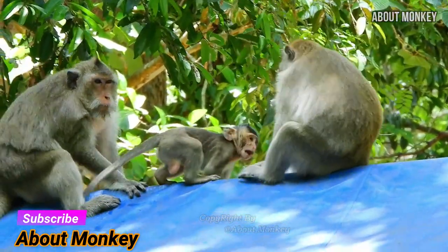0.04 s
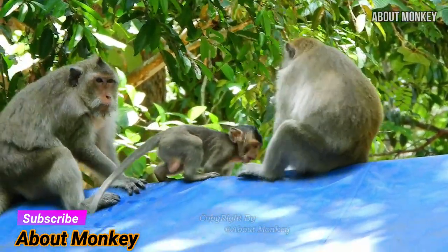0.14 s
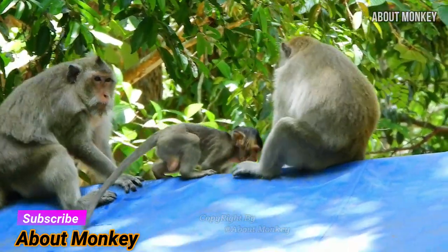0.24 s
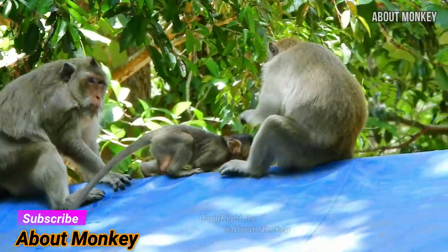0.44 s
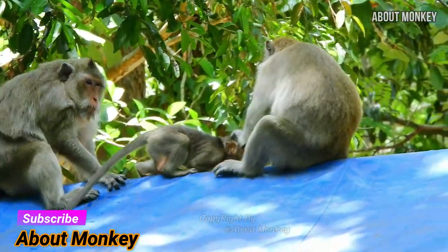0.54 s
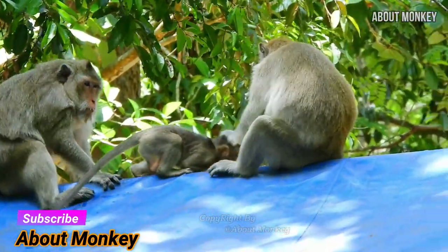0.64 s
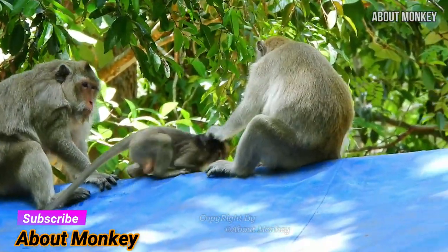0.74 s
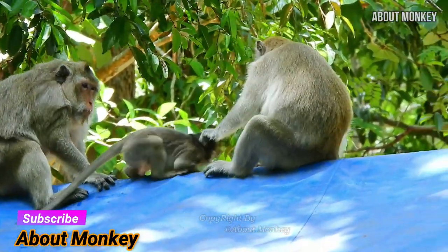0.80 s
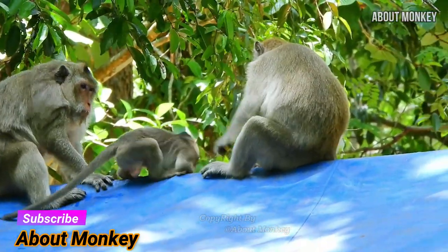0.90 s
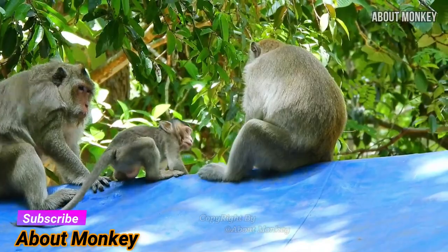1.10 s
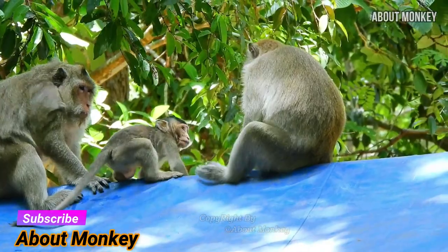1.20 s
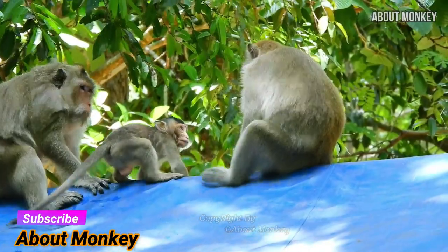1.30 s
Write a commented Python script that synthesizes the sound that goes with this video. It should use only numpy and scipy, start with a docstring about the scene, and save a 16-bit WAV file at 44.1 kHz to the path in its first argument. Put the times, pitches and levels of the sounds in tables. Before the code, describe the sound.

Very high, raspy baby monkey squeaks burst out rapidly, then fade into quiet leafy outdoor air

```python
"""A baby monkey squeals three times in one quick run on a tarpaulin under trees.
Each squeak is a pitch-curved whistle that roughens into rasp and hiss: the first mostly falls,
the second climbs and breaks into a rasp, the third arches high and drops; gliding noise bands form
hoarse undertones and small late calls. Reflections and a noise tail with lingering pitches ring on;
soft bumps are single low modes with scuffing, a twig tap is four decaying modes,
and shaped noise gives a low outdoor rumble and leaf hiss, its treble fading slowly."""
import sys
import numpy as np
from scipy import signal
from scipy.fft import rfft, irfft
from scipy.io import wavfile
from scipy.ndimage import uniform_filter1d

SR = 44100
rng = np.random.default_rng(int(sys.argv[2]) if len(sys.argv) > 2 else 0)


def master_out(mix):
    """Clip the mix to full scale and print it as 16-bit PCM to the path in sys.argv[1]."""
    frames = np.transpose(np.atleast_2d(mix))
    ceiling = np.clip(frames, -1, 1)
    pcm = np.round(ceiling * 32767).astype(np.int16)
    wavfile.write(sys.argv[1], SR, pcm)


N = 59535

# squeak curves: time_s, pitch_hz, level_db, roughness_0_to_1
FALLING_SQUEAK = [(.168, 8900, -51, 0.38), (.177, 9200, -52.5, 0.04), (.184, 9250, -39, 0.23),
                  (.189, 7905, -44.5, 0), (.198, 6100, -35.5, .2), (.207, 5720, -43, 0.54),
                  (.213, 5243, -45, 0.63), (.220, 5203, -40.5, 0.28), (.227, 5843, -39.5, 0.88),
                  (.238, 6380, -39, 0.5)]
CLIMBING_SQUEAK = [(.241, 6580, -28.5, .02), (.247, 6636, -26, 0.027), (.257, 6500, -38.5, 0.078),
                   (.263, 6340, -35.5, 0.39), (.271, 6049, -39, 0.87), (.273, 6455, -27.5, 0.19),
                   (.276, 6654, -23.5, 0.19), (.279, 7110, -30, 0.16), (.283, 7220, -24, 0.065),
                   (.292, 7400, -23, 0.081), (.301, 8030, -16.5, 0.084), (.305, 8150, -30.5, 0.31),
                   (.314, 8250, -24, 0.21), (.321, 8350, -33, 0.79), (.330, 8300, -27, 0.37),
                   (.337, 8680, -31.5, 0.49), (.356, 8900, -45, 0.97), (.368, 9310, -37.5, 0.33),
                   (.378, 9300, -40.5, 0.41), (.382, 8700, -38, 0.33), (0.39, 8720, -36, 0.17),
                   (.396, 8860, -47, .3)]
ARCHING_SQUEAK = [(.425, 9500, -45, 0.42), (.437, 10270, -43, 0.16), (.447, 10470, -43, 0.1),
                  (.456, 10130, -34, 0.064), (.465, 9540, -34, .12), (.474, 10050, -40, 0.2),
                  (.489, 10120, -33, .11), (.498, 10200, -37.5, 0.16), (.505, 10420, -50, .25),
                  (.519, 11050, -45.5, 0.21), (.528, 10680, -42.5, .25), (.540, 9580, -32.5, 0.13),
                  (.551, 8990, -41, 0.33), (.563, 8200, -46, .7), (.571, 7220, -47.5, 0.67),
                  (.576, 5500, -49.5, 0.44)]
EDGE_S, PITCH_SMOOTH_SAMPLES = 0.003, 130  # onset and release; pitch averaging
# pitch tremble, rms share of the pitch; the rasp share is at full roughness
JITTER_SHARE, JITTER_HZ = 0.0052, 262
RASP_JITTER_SHARE, RASP_JITTER_HZ = 0.0351, 727
# noise at full roughness: band on the whistle, side band below it, hiss
RASP_WIDTH_HZ, RASP_DB = 1100, 1.5
GROWL_PITCH_RATIO, GROWL_WIDTH_HZ, GROWL_DB = 0.61, 940, -17
AIR_DB = -3.5
FLUTTER_DB, FLUTTER_HZ = 2.4, 150  # rms level tremble at full roughness
# spectrum shape of the squeak hiss: freq_hz, relative_db
AIR_SHAPE = [(1500, -72), (2500, -24), (3400, -9), (4200, -13.5), (5000, -2.5), (6500, 1), (8000, 5.5),
             (9600, 0.5), (11000, -3.5), (12000, -14)]
# hoarse undertones where the voice cracks, then a small low chirp and a late call:
# start_s, length_s, start_hz, end_hz, width_hz, level_db, octave_re_base_db
HOARSE_BANDS = [(0.264, 0.0134, 2620, 2770, 230, -60.5, 17), (.308, 0.019, 2780, 2720, 150, -49, 2),
                (.304, 0.068, 3403, 3298, 520, -48, -10), (.320, 0.021, 2572, 2504, 220, -62, 15.5),
                (.581, 0.0237, 2480, 2120, 580, -52.5, -9), (.600, 0.07, 2660, 2600, 261, -58.5, -6)]
# soft bumps on the tarpaulin: start_s, pitch_hz, level_db, scuff_re_body_db, left_minus_right_db
BUMPS = [(0.065, 79.5, -58, -18, 5), (0.14, 89, -52, -16, 7), (.268, 200, -46, -15, 4),
         (0.354, 147, -49.5, -17, -3), (0.615, 150, -47.5, -14, -1), (0.659, 147.6, -49.5, -18, -3),
         (0.74, 131, -45.5, -16.5, -10), (0.939, 140, -41.5, -25, 20), (1.127, 139, -47, -26, -7),
         (1.231, 178, -42, -9, -22)]
BUMP_RISE_S, BUMP_LENGTH_S = 0.0095, 0.125
SCUFF_HZ, SCUFF_WIDTH_HZ = 314.6, 320
TAP_START_S, TAP_DB = 1.3408, -41.5
# twig modes: freq_hz, level_re_tap_db, t60_s
TWIG_MODES = [(1020, -19, .012), (1514, 2, .029), (2140, 2, 0.011), (3540, -8, 0.024)]
# early reflections: delay_s, left_gain, right_gain
REFLECTIONS = [(.0034, 0.063, -0.086), (.0078, 0.14, 0.13), (.0135, -.14, .17), (.021, .15, .14)]
# diffuse tail of the surroundings: freq_hz, t60_s, relative_db
TAIL_DECAY = [(500, .18, -2), (3000, 0.72, 0), (6400, 0.64, 0), (8000, .56, -3.5), (9060, 0.63, 4),
              (10000, 0.53, 0.5), (11000, 0.54, 1)]
# pitches lingering in the surroundings: freq_hz, level_re_tail_db, t60_s
LINGERING_MODES = [(6455, -49.5, 0.43), (6600, -59, 0.37), (7240, -64.5, .7), (7500, -59, 0.54),
                   (8180, -56, .5), (9100, -55, .65)]
VOICE_TAIL_DB, SMALL_TAIL_DB = -1.66, -5  # tail re direct sound: squeaks; hoarse bands and tap
TAIL_LIKENESS, TAIL_RISE_S = 0.14, 0.0029
# outdoor background spectrum shape: freq_hz, relative_db
OUTDOOR_SHAPE = [(20, -27), (45, -18.5), (85, -23), (120, -4.5), (155, 3), (220, -10), (300, -14),
                 (520, -15.5), (720, -18), (1200, -16), (2000, -19.5), (2800, -20), (4200, -23),
                 (7000, -20.5), (9300, -17.5), (10800, -28), (12000, -20.5), (15000, -46)]
# outdoor background stereo: freq_hz, left_right_correlation
OUTDOOR_LIKENESS = [(30, -0.33), (130, 0.12), (300, 0.65), (800, 0.71), (3000, 0.58), (10000, 0.049)]
OUTDOOR_DB, PATCH_DB = -51, 1.5  # overall rms; rms of the patches
TREBLE_FADE_DB_PER_S, TREBLE_FROM_HZ = 2.5, 2500  # the treble hiss fades slowly
TREBLE_EDGE_HZ, BAND_LIMIT_HZ, TREBLE_LEAK_DB = 11200, 15100, -13.5


def amp(db):
    """Decibels to gain."""
    return 10 ** (np.asarray(db) / 20)


def evened(x):
    """Scales to rms 1."""
    return x / np.sqrt(np.mean(x ** 2) + 1e-20)


def read(points, hz):
    """Reads a spectrum on a log-frequency axis."""
    f, value = np.transpose(points)
    return np.interp(np.log(hz + 1), np.log(f + 1), value)


def add(mix, start_s, sound):
    """Mixes a sound in at its start, cut at the end of the mix."""
    part = mix[..., round(start_s * SR):][..., :sound.shape[-1]]
    part += sound[..., :part.shape[-1]]


def filtered_noise(gain, n):
    """White noise shaped by a spectrum gain, scaled to rms 1 before trimming to n samples."""
    return evened(irfft(rfft(rng.standard_normal(N)) * gain, N))[:n]


def wobble(n, hz):
    """Smooth random motion up to about hz."""
    f = np.fft.rfftfreq(N, 1 / SR)
    return filtered_noise(1 / (1 + (f / hz) ** 2), n)


def fuzzy(hz, width_hz):
    """A noisy band that follows a pitch curve: two slow noises on carriers in quadrature."""
    phase = 2 * np.pi * np.cumsum(hz) / SR
    in_phase = wobble(len(hz), width_hz / 2) * np.cos(phase)
    quadrature = wobble(len(hz), width_hz / 2) * np.sin(phase)
    return in_phase + quadrature


def squeak(curve):
    """A trembling whistle that gives way to rasp and hiss as it roughens."""
    time_s, pitch_hz, level_db, roughness = np.transpose(curve)
    t = np.arange(time_s[0] - EDGE_S, time_s[-1] + EDGE_S, 1 / SR)
    n = len(t)
    rough = np.clip(np.interp(t, time_s, roughness), 0, 1)
    hz = uniform_filter1d(np.interp(t, time_s, pitch_hz), size=PITCH_SMOOTH_SAMPLES)

    tremble = JITTER_SHARE * wobble(n, JITTER_HZ)
    rasp_tremble = RASP_JITTER_SHARE * rough * wobble(n, RASP_JITTER_HZ)
    phase = 2 * np.pi * np.cumsum(hz * (1 + tremble + rasp_tremble)) / SR
    whistle = np.sqrt(2 * (1 - rough ** 2)) * np.sin(phase)

    rasp = amp(RASP_DB) * fuzzy(hz, RASP_WIDTH_HZ)
    growl = amp(GROWL_DB) * fuzzy(GROWL_PITCH_RATIO * hz, GROWL_WIDTH_HZ)
    air_gain = amp(read(AIR_SHAPE, np.fft.rfftfreq(N, 1 / SR)))
    air = amp(AIR_DB) * filtered_noise(air_gain, n)
    voice = whistle + rough * (rasp + growl + air)

    gate = np.clip(np.minimum(t - t[0], t[-1] - t) / EDGE_S, 0, 1)
    flutter_db = FLUTTER_DB * rough * wobble(n, FLUTTER_HZ)
    return t[0], voice * gate * amp(np.interp(t, time_s, level_db) + flutter_db)


def hoarse_band(start_s, length_s, start_hz, end_hz, width_hz, level_db, octave_db):
    """A short hoarse undertone or small call: a gliding noise band with its octave."""
    u = np.linspace(0, 1, round(length_s * SR))
    hz = start_hz + (end_hz - start_hz) * u
    base = evened(fuzzy(hz, width_hz))
    octave = amp(octave_db) * fuzzy(2 * hz, 2 * width_hz)
    envelope = np.sqrt(abs(np.sin(np.pi * u)))
    return start_s, amp(level_db) * envelope * (base + octave)


def bump(start_s, pitch_hz, level_db, scuff_db, pan_db):
    """A padded push swells and dies in one low mode, with a little scuffing."""
    t = np.arange(int(BUMP_LENGTH_S * SR)) / SR
    swell = t / BUMP_RISE_S * np.exp(1 - t / BUMP_RISE_S)
    mode = np.sin(2 * np.pi * pitch_hz * t)
    scuff = amp(scuff_db) * fuzzy(np.full(len(t), SCUFF_HZ), SCUFF_WIDTH_HZ)
    sides = evened(amp([[pan_db / 2], [-pan_db / 2]]))
    return start_s, amp(level_db) * sides * swell * (mode + scuff)


def tap():
    """A dry tick of a twig: a few modes decaying exponentially."""
    t = np.arange(SR // 20) / SR
    tick = np.zeros(len(t))
    for hz, db, t60_s in TWIG_MODES:
        tick += amp(TAP_DB + db - 60 * t / t60_s) * np.sin(2 * np.pi * hz * t)
    return TAP_START_S, tick


def surroundings(x, tail_db):
    """Direct sound, a few near reflections and a diffuse tail in which some pitches linger."""
    a, b = rng.standard_normal((2, SR))
    noise = np.array([a, TAIL_LIKENESS * a + np.sqrt(1 - TAIL_LIKENESS ** 2) * b])
    hz, t, z = signal.stft(noise, SR, nperseg=256)
    decay = np.array(TAIL_DECAY)
    t60_s = read(decay[:, :2], hz)[:, None]
    fade_db = read(decay[:, [0, 2]], hz)[:, None] - 60 * t / t60_s
    rise = 1 - np.exp(-t / TAIL_RISE_S)
    tail = signal.istft(z * amp(fade_db) * rise, SR, nperseg=256)[1]

    t = np.arange(tail.shape[1]) / SR
    modes = np.zeros(len(t))
    for mode_hz, db, mode_t60_s in LINGERING_MODES:
        modes += amp(db - 60 * t / mode_t60_s) * np.sin(2 * np.pi * (mode_hz * t + rng.random()))

    response = amp(tail_db) * (tail / np.linalg.norm(tail[0]) + modes)
    response[:, 0] += 1  # direct sound
    for delay_s, left, right in REFLECTIONS:
        response[:, round(delay_s * SR)] += left, right
    return signal.fftconvolve(x[None], response, axes=1)[:, :N]


def outdoors():
    """Low rumble and leaf hiss: noise shaped per band, with drifting patches and fading treble."""
    frames, hz = N // 256 + 5, np.fft.rfftfreq(1024, 1 / SR)
    a, b, c, d, patches = rng.standard_normal((5, frames, 513))
    patches = uniform_filter1d(patches, size=12, axis=0)
    patches = evened(uniform_filter1d(patches, size=12, axis=1))

    likeness = np.clip(read(OUTDOOR_LIKENESS, hz), -1, 1)
    left = a + 1j * b
    right = likeness * left + np.sqrt(1 - likeness ** 2) * (c + 1j * d)

    fade_s = np.linspace(.5, -.5, frames)[:, None] * N / SR
    treble_share = hz ** 2 / (hz ** 2 + TREBLE_FROM_HZ ** 2)
    fade_db = TREBLE_FADE_DB_PER_S * fade_s * treble_share
    z = np.array([left, right]) * amp(read(OUTDOOR_SHAPE, hz) + PATCH_DB * patches + fade_db)
    noise = signal.istft(z.transpose(0, 2, 1), nperseg=1024, noverlap=768)[1][:, :N]
    return amp(OUTDOOR_DB) * evened(noise)


def scene():
    """The monkey and the twig in their surroundings, over bumps and background."""
    voice, small, bumps = np.zeros(N), np.zeros(N), np.zeros((2, N))
    for curve in (FALLING_SQUEAK, CLIMBING_SQUEAK, ARCHING_SQUEAK):
        add(voice, *squeak(curve))
    for row in HOARSE_BANDS:
        add(small, *hoarse_band(*row))
    add(small, *tap())
    for row in BUMPS:
        add(bumps, *bump(*row))
    ringing = surroundings(voice, VOICE_TAIL_DB) + surroundings(small, SMALL_TAIL_DB)
    return ringing + bumps + outdoors()


def record(dry):
    """The top of the treble drops steeply, with a faint remainder up to the band limit."""
    leak = amp(TREBLE_LEAK_DB)
    edge = signal.firwin(255, TREBLE_EDGE_HZ, fs=SR)
    limit = signal.firwin(255, BAND_LIMIT_HZ, window=("kaiser", 10), fs=SR)
    taps = np.convolve((1 - leak) * edge + leak * limit, limit)
    return signal.oaconvolve(dry, taps[None], "same")


dry = scene()
out = record(dry)
master_out(out)
```